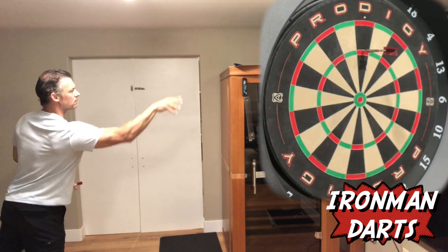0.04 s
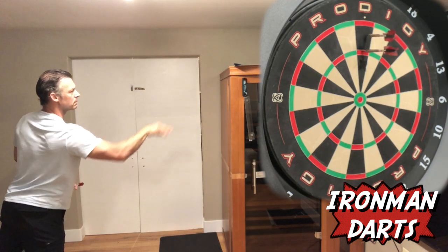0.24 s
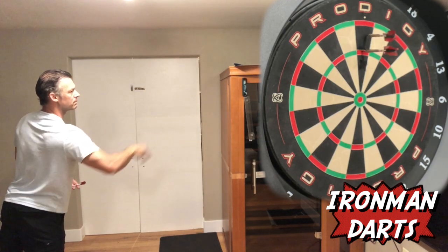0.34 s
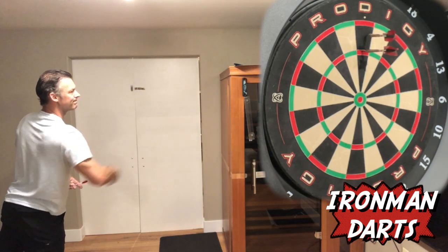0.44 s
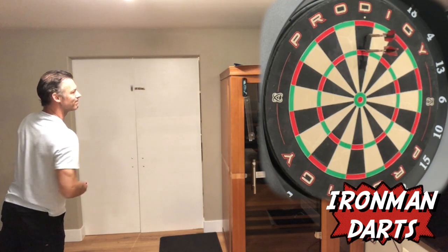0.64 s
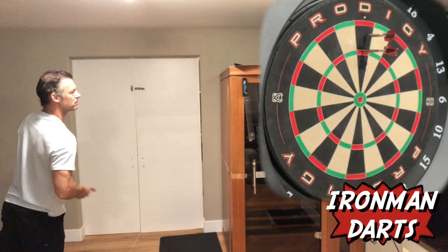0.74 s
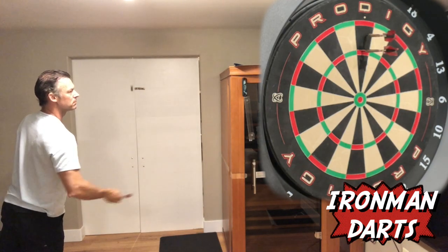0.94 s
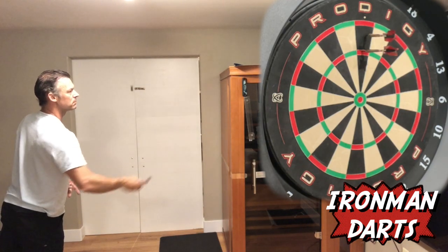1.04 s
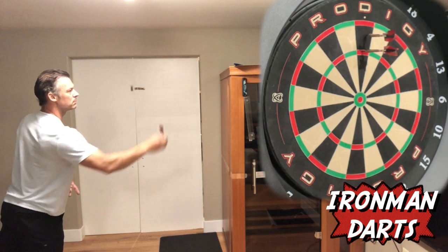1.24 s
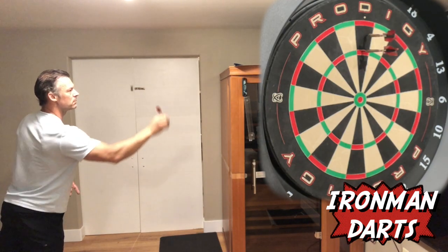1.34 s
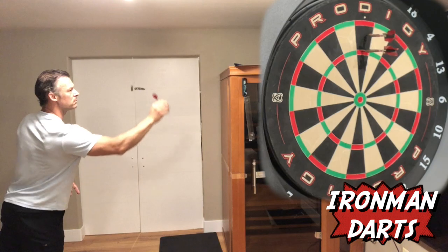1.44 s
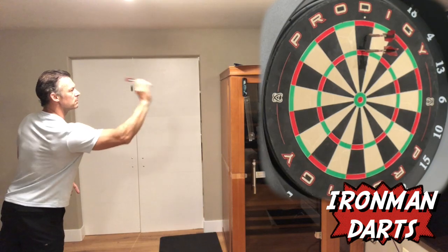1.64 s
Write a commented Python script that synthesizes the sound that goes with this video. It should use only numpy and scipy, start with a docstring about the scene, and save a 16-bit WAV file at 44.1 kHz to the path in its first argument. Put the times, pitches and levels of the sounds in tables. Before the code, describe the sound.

A dart hits a bristle dartboard at about 0.2 seconds, close to the microphone, with a sharp tick and a low thud. The board rocks until about 0.5 seconds as the room's short echo fades. Near 0.6 seconds darts clink faintly across the room, and from about 1.2 seconds a sleeve rustles very softly. A faint appliance hum and low rumble of air continue throughout.

```python
"""A quiet living room, one microphone close beside a bristle dartboard. A dart lands: the point ticks,
the barrel buzzes as the bristles stop it, the board and its mount swell into a thud and rock, and the
room rings on. Across the room the next dart clinks faintly in the hand, and a sleeve rustles as the
arm rises. An appliance hums over a low rumble of air."""
import sys
import numpy as np
from scipy import signal
from scipy.fft import rfft, irfft
from scipy.io import wavfile

SR = 44100
rng = np.random.default_rng(int(sys.argv[2]) if len(sys.argv) > 2 else 0)


def wrap_up_sound(samples):
    """Save the sound to the file named by the first command line argument, as 16-bit audio."""
    columns = np.atleast_2d(samples).T
    # keep every value between -1 and 1, then stretch to whole-number steps
    tamed = np.clip(columns, -1, 1)
    steps = np.round(tamed * 32767).astype(np.int16)
    wavfile.write(sys.argv[1], SR, steps)


N = 74970
TIME = np.arange(N) / SR
FREQS = np.maximum(np.fft.rfftfreq(N, 1 / SR), 1)
HIT_S = 0.219   # the point meets the board
THUD_S = HIT_S + 0.00405   # the barrel stops and the board starts to move


def dart():
    """Right at the microphone, the point ticks, the barrel buzzes as it stops, and the dart rings on."""
    # Tick of point, shaft and flight. Each row: frequency in Hz, relative level in dB per Hz.
    tick_colour = [(1500, -1), (2800, -6), (3300, -6), (4400, -19), (4800, -31), (7100, -14.5), (7700, -2),
                   (10000, -5.5), (10600, -13), (15500, -17)]
    # The barrel, stopped by the bristles. Each row: frequency in Hz, relative level in dB per Hz.
    barrel_colour = [(1500, -9), (2800, -13.5), (3200, 7.5), (4400, 5), (4900, -13), (9000, -29)]
    # The dart's thin ring. Each row: frequency in Hz, level in dB, t60 in seconds.
    modes = [(3340, -61, 0.79), (3500, -66, 0.98), (3790, -85, .6)]
    attack_s = 0.0003
    tick = from_db(-44.5) * noise(tick_colour) * envelope(HIT_S, attack_s, hold=0.0063, t60=0.057)
    barrel = from_db(-45) * noise(barrel_colour) * envelope(THUD_S, attack_s, t60=0.078)
    ring = sum(from_db(db) * damped_tone(hz, THUD_S, attack_s, t60) for hz, db, t60 in modes)
    return tick + barrel + ring


def board():
    """The thud, close up: low modes of the board and its mount swell and die inside a dense knock."""
    # Board and mount modes. Each row: frequency in Hz, level in dB, t60 in seconds, swell in seconds.
    modes = [(86.7, -24.5, 0.57, 0.015), (125.9, -31, 0.38, 0.016), (152, -22.5, 0.058, 0.012),
             (170, -33.5, 0.71, 0.012), (219, -38.5, 0.94, 0.016), (314.8, -35, 0.65, 0.0073),
             (370, -27, 0.4, 0.011), (424.7, -29, 0.22, 0.018), (488, -27.5, 0.08, 0.014),
             (523.4, -29, 0.45, .008), (535.5, -43.5, 0.38, 0.0093), (594.2, -24, 0.23, 0.0062),
             (676, -29, 0.35, 0.0055), (811, -40, 0.24, 0.0054), (901, -31, 0.19, 0.0017),
             (960, -39.5, .3, 0.0028)]
    # Knock of the board and the wall behind. Each row: frequency in Hz, relative level in dB per Hz.
    knock_colour = [(60, -20), (90, -1), (160, -2.5), (270, -7), (480, -2), (630, 1), (760, -10.5),
                    (960, -9), (1080, -27), (1600, -33), (2600, -31.5)]
    ring = sum((-1) ** k * from_db(db) * damped_tone(hz, THUD_S, swell, t60)
               for k, (hz, db, t60, swell) in enumerate(modes))
    knock = from_db(-32) * noise(knock_colour) * envelope(THUD_S, swell=0.013, hold=0.027, t60=0.54)
    return ring + knock


def rocking():
    """The whole board rocks on its mount in short, heavily damped swings."""
    # One deep bump per swing. Each row: start in seconds, level in dB.
    bumps = [(.247, -21.5), (0.366, -24.5), (.464, -28)]
    return sum(from_db(db) * damped_tone(hz=79, start=start, swell=0.011, t60=0.11)
               for start, db in bumps)


def room():
    """The hit dies away between the living room walls."""
    # The room's answer to the hit. Each row: frequency in Hz, relative level in dB per Hz.
    colour = [(40, 4), (85, 10.5), (250, -2.5), (620, 4), (950, -4), (1150, -14.5), (1800, -25),
              (2700, -31), (3500, -26), (4800, -33), (6500, -37), (8000, -31.5), (10000, -33),
              (10700, -42.5), (15500, -43)]
    return from_db(-24.5) * reverberation(colour, THUD_S, swell=0.004)


def clink():
    """Darts touch in the hand across the room; the microphone hears only their reverberation."""
    # Metal on metal. Each row: frequency in Hz, relative level in dB per Hz.
    colour = [(2000, -20), (2900, -11), (3450, 2), (4000, -4), (4800, -11), (6000, -10.5), (7800, -9),
              (9200, -15), (10000, -10), (11000, -20), (15500, -19)]
    # The faint touch. Each row: start in seconds, level in dB.
    touches = [(0.567, -62)]
    return sum(from_db(db) * reverberation(colour, start, swell=0.011, hold=0.011, t60_scale=0.98)
               for start, db in touches)


def sleeve():
    """Cloth slides ever faster as the arm comes up for the next throw."""
    # Rustle of cloth. Each row: frequency in Hz, relative level in dB per Hz.
    colour = [(1200, 11.5), (2500, -8), (5500, -1), (8000, -19), (15000, -28)]
    return from_db(-73) * noise(colour) * envelope(start=1.15, swell=0.44, hold=1, t60=1)


def appliance():
    """Motor and mains tones hum in the background, wavering a little in level and phase."""
    # Tones of the hum. Each row: frequency in Hz, rms level in dB.
    tones = [(86.5, -48), (119.5, -47), (240.5, -54.5), (289.3, -48.5), (479, -68.5), (1017, -76.5)]
    hum = 0
    for hz, db in tones:
        amplitude = np.sqrt(2) * from_db(db + drift(rate_hz=3))
        phase = 2 * np.pi * (hz * TIME + rng.random()) + 0.25 * drift(rate_hz=3)
        hum += amplitude * np.sin(phase)
    return hum


def air():
    """Room tone: a low rumble of moving air under a faint hiss that slowly sinks and rises."""
    # Moving air. Each row: frequency in Hz, relative level in dB per Hz.
    colour = [(22, -13), (36, -4), (52, -7), (90, -0.5), (150, -6), (280, -12), (400, -21), (520, -20),
              (720, -27), (1050, -32.5), (1600, -44.5), (4000, -49.5), (7300, -55.5), (8500, -58.5),
              (15500, -65)]
    # Course of the hiss. Each row: time in seconds, gain in dB.
    hiss_course = [(0, 1), (.2, 1), (.9, 0.5), (1.2, -0.5), (1.7, 1)]
    room_tone = from_db(-43.5) * noise(colour)
    hiss = irfft(rfft(room_tone) * (FREQS > 2100), N)
    rumble = room_tone - hiss
    return rumble + hiss * from_db(np.interp(TIME, *np.transpose(hiss_course)))


def reverberation(colour, start, swell, hold=0, t60_scale=1):
    """Diffuse sound whose half-octave bands each die at the room's own rate."""
    # Decay of the living room. Each row: frequency in Hz, t60 in seconds.
    decay_times = [(80, 0.6), (300, 0.57), (700, 0.76), (2000, 1), (3500, 0.81), (6000, 0.75), (9000, 0.5),
                   (14000, .33)]
    field, tail = rfft(noise(colour)), 0
    octaves = np.log2(FREQS)
    for centre in np.arange(5, 14.6, 0.5):
        band = irfft(field * np.maximum(1 - 2 * abs(octaves - centre), 0), N)
        t60 = t60_scale * at_hz(decay_times, 2 ** centre)
        tail += band * envelope(start, swell, t60, hold)
    return tail


def near_reflections(direct):
    """Hard surfaces close to the microphone throw back the treble and ripple its colour."""
    # Short echoes. Each row: delay in seconds, gain in dB.
    echoes = [(.0016, -28.5), (.0044, -19), (.0071, -17.5)]
    treble = filtered(signal.butter(2, 1300, "high", fs=SR, output="sos"), direct)
    return direct + sum(from_db(db) * np.roll(treble, int(delay * SR)) for delay, db in echoes)


def from_db(db):
    """Decibels to gain."""
    return 10 ** (np.asarray(db) / 20)


def at_hz(points, hz):
    """Read a table on a log-frequency axis."""
    freqs, values = np.transpose(points)
    return np.interp(np.log(hz), np.log(freqs), values)


def noise(colour):
    """Steady noise of rms 1 that falls away steeply beyond the ends of its colour table."""
    falloff = np.minimum(1, np.minimum(FREQS / colour[0][0], colour[-1][0] / FREQS)) ** 3
    x = irfft(rfft(rng.standard_normal(N)) * from_db(at_hz(colour, FREQS)) * falloff, N)
    return x / x.std()


def drift(rate_hz):
    """Slow random wander with spread 1."""
    x = irfft(rfft(rng.standard_normal(N)) / (1 + (FREQS / rate_hz) ** 2), N)
    return (x - x.mean()) / x.std()


def envelope(start, swell, t60, hold=0):
    """Smooth swell, hold, then a decay of 60 dB per t60; all times in seconds."""
    age = TIME - start
    rise = np.sin(np.pi / 2 * np.clip(age / swell, 0, 1)) ** 2
    return rise * np.exp(-np.log(1000) * np.maximum(age - swell - hold, 0) / t60)


def damped_tone(hz, start, swell, t60):
    """One mode of vibration: a sine that swells and dies away."""
    return np.sin(2 * np.pi * hz * (TIME - start)) * envelope(start, swell, t60)


def filtered(sos, x):
    """A causal filter, settled before the sound begins."""
    run_in = 4000   # samples
    return signal.sosfilt(sos, np.pad(x, (run_in, 0), mode="reflect", reflect_type="odd"))[run_in:]


def scene():
    """Everything at one microphone beside the board."""
    hit = dart() + board() + rocking() + room()
    return near_reflections(hit + clink() + sleeve() + appliance() + air())[None]


def record(dry):
    """The microphone drops the deepest bass; the top is cut steeply."""
    low_cut = signal.butter(6, 56.3, "high", fs=SR, output="sos")
    high_cut = signal.ellip(12, 0.1, 80, 15750, fs=SR, output="sos")
    return filtered(high_cut, filtered(low_cut, dry[0]))[None]


dry = scene()
out = record(dry)
wrap_up_sound(out)
```